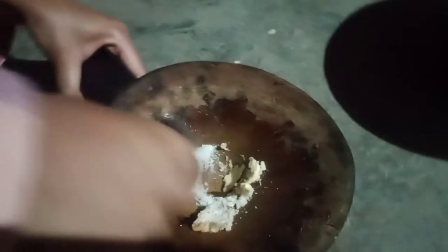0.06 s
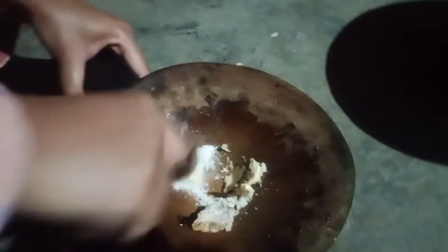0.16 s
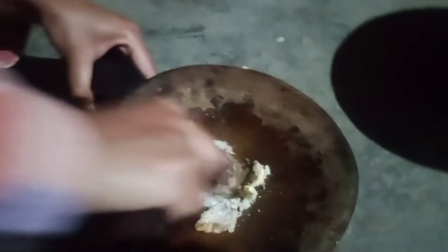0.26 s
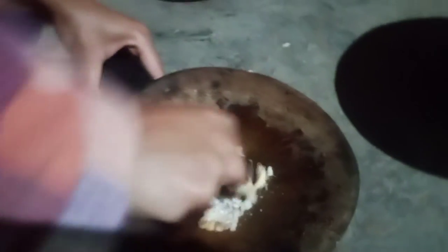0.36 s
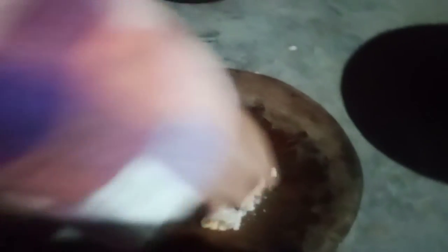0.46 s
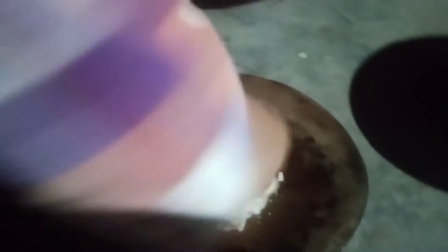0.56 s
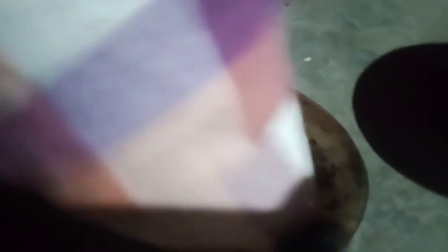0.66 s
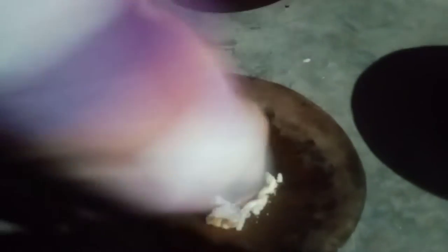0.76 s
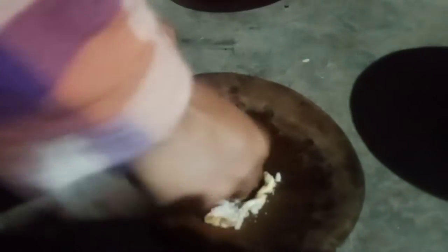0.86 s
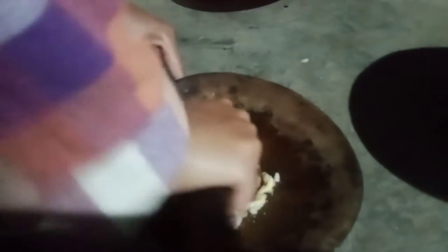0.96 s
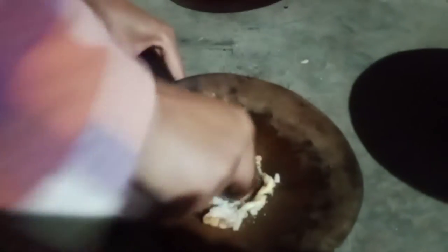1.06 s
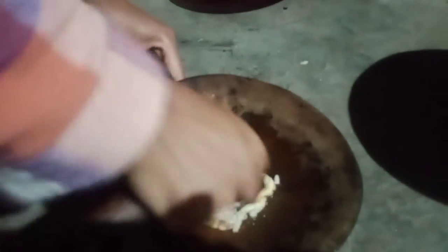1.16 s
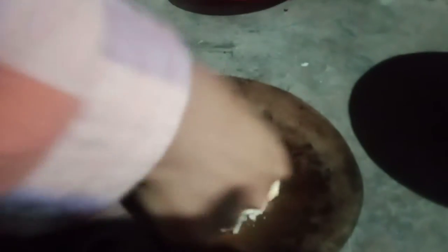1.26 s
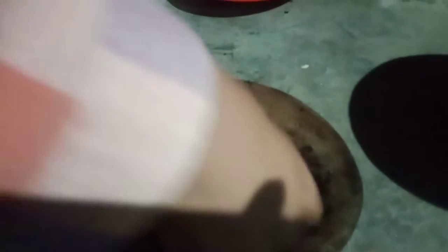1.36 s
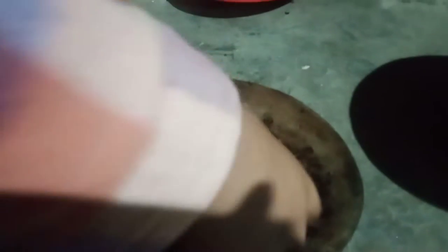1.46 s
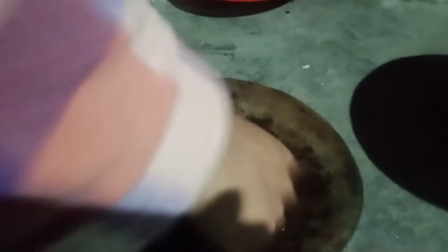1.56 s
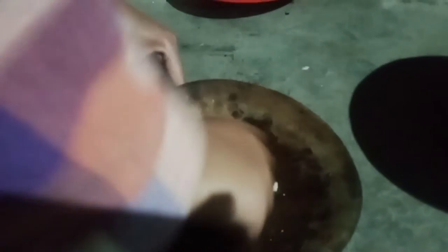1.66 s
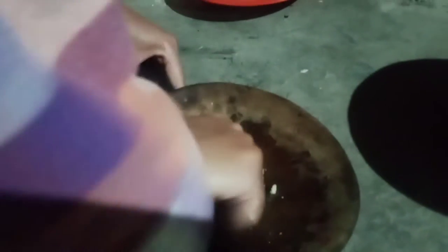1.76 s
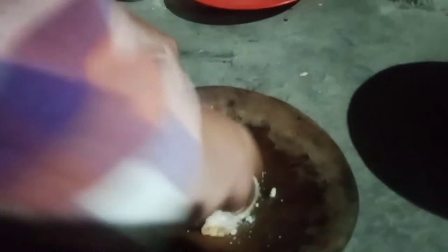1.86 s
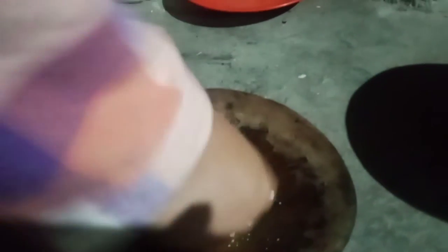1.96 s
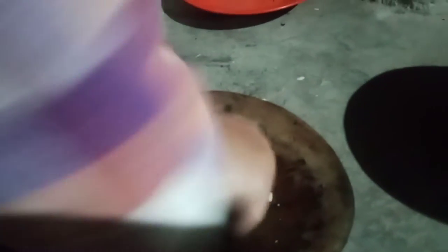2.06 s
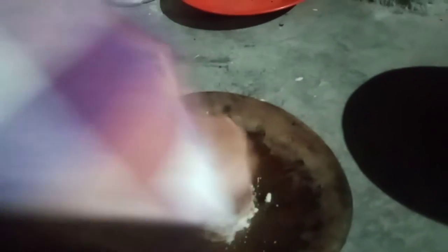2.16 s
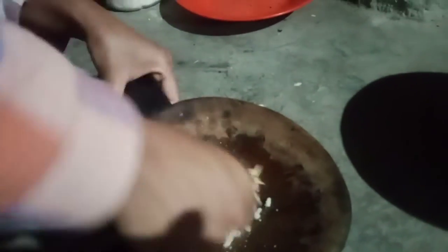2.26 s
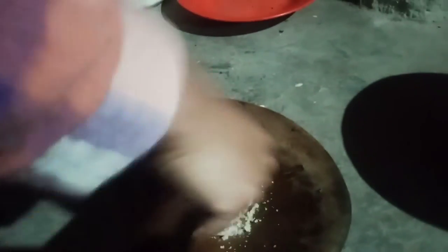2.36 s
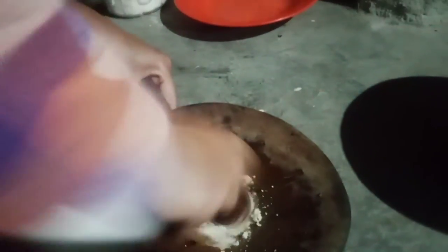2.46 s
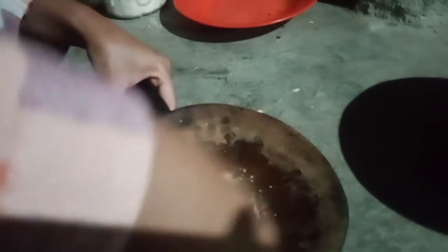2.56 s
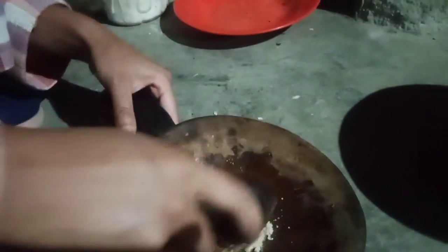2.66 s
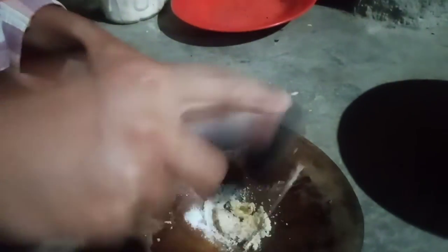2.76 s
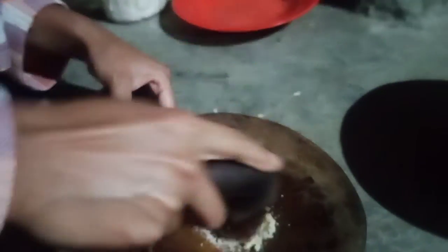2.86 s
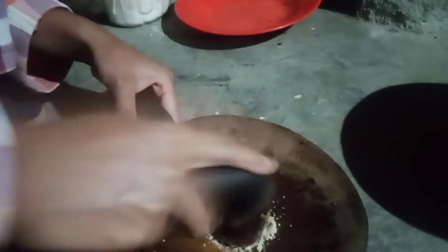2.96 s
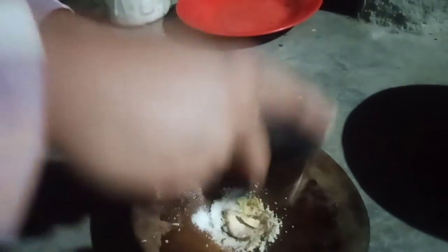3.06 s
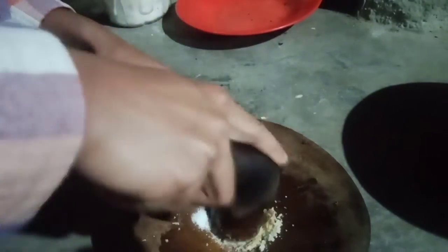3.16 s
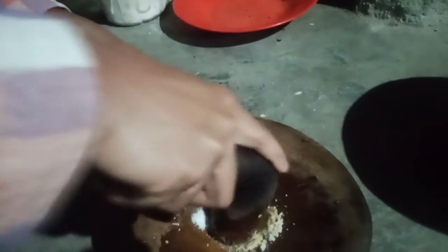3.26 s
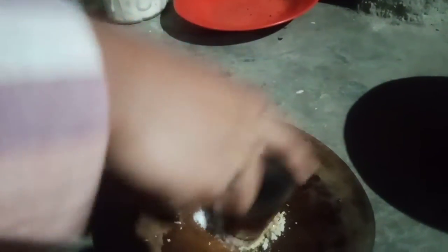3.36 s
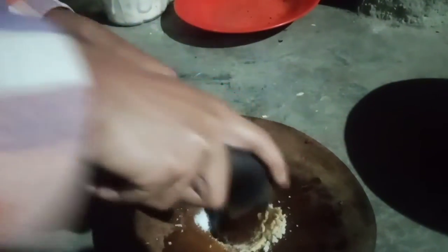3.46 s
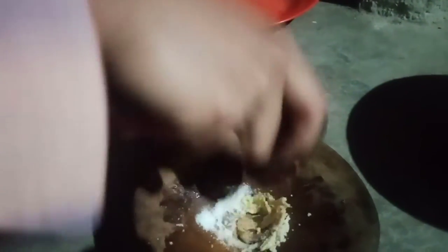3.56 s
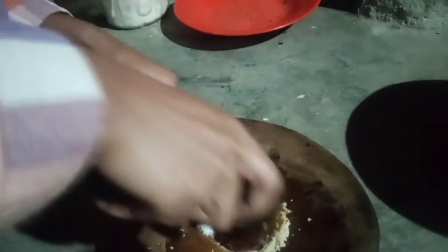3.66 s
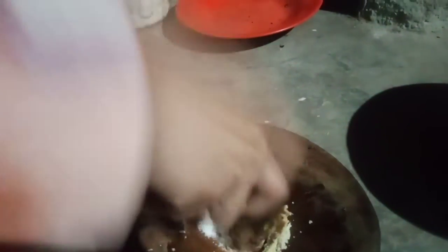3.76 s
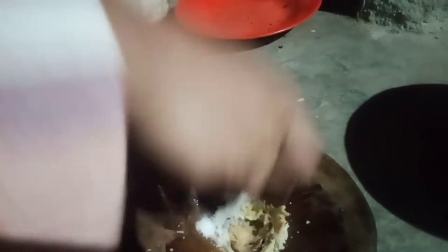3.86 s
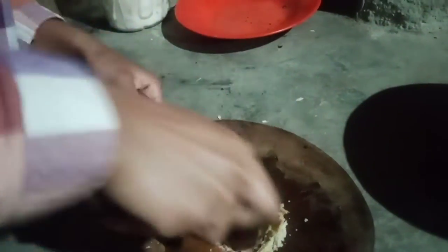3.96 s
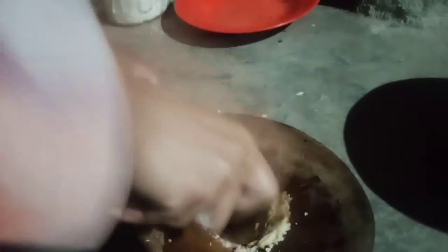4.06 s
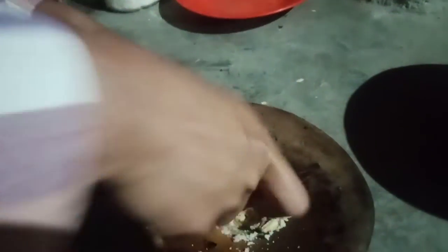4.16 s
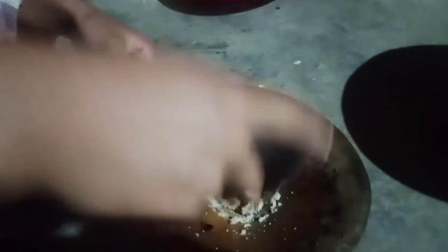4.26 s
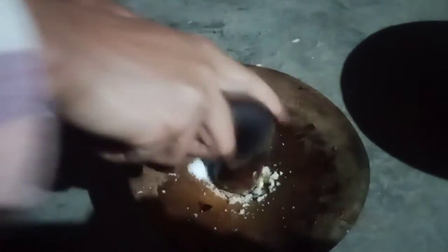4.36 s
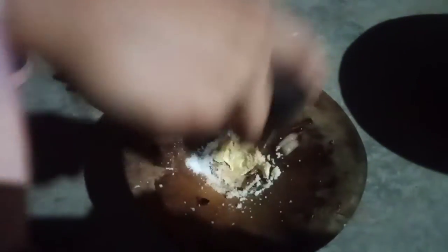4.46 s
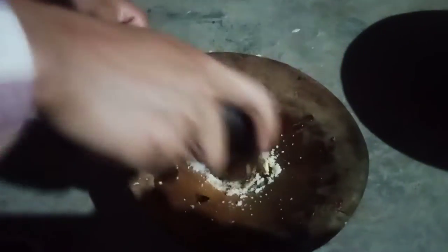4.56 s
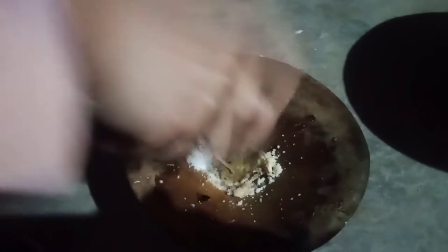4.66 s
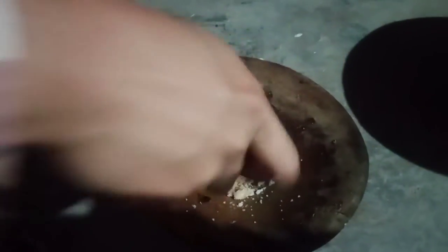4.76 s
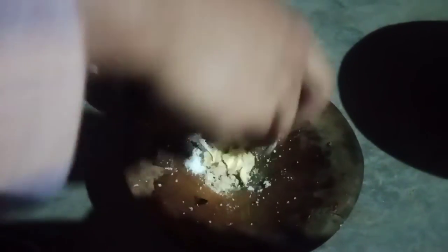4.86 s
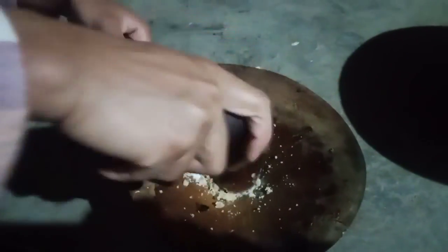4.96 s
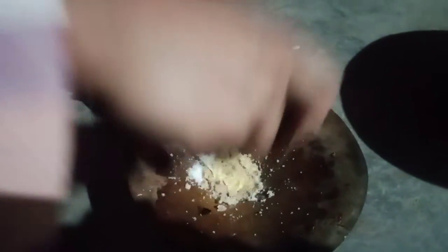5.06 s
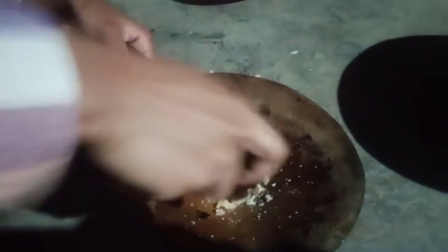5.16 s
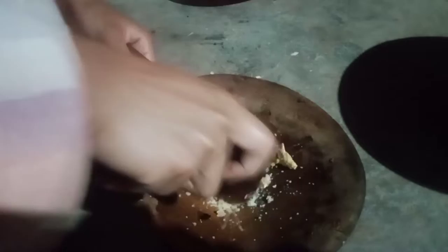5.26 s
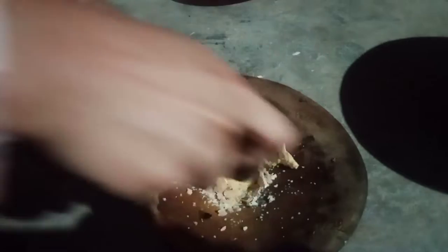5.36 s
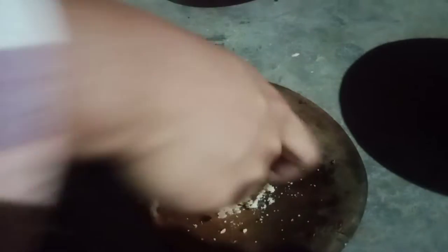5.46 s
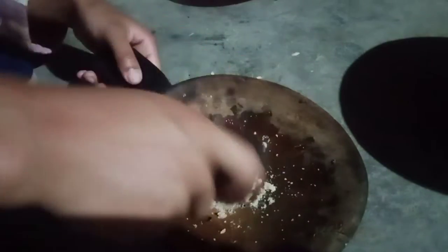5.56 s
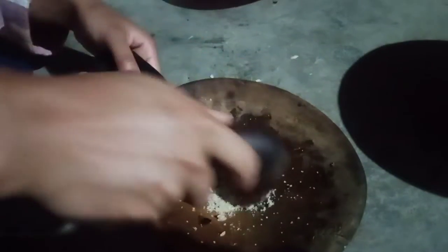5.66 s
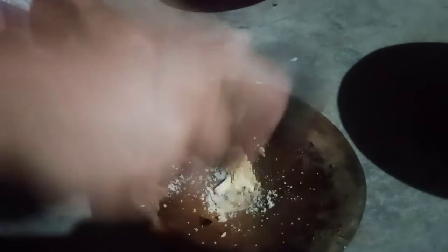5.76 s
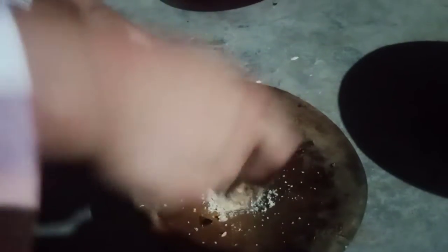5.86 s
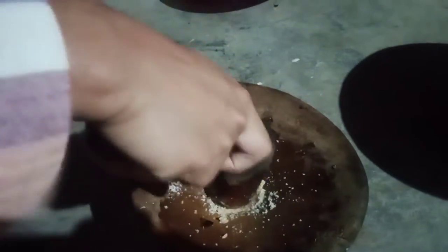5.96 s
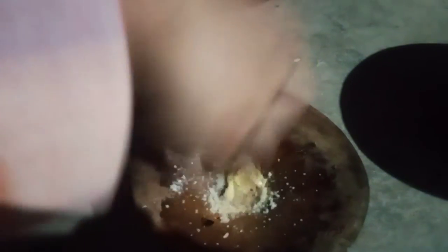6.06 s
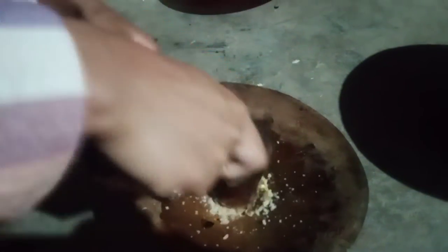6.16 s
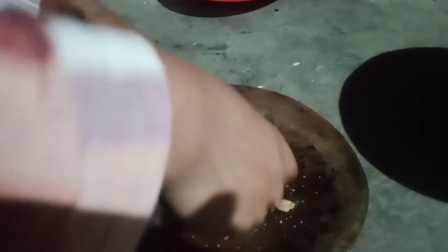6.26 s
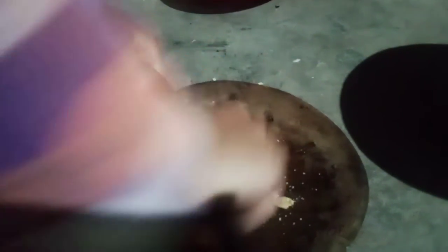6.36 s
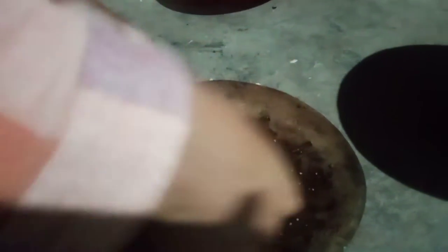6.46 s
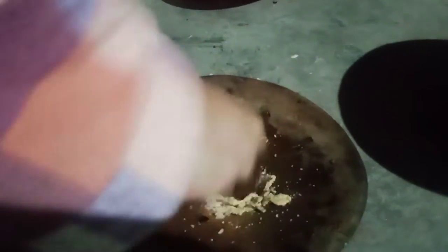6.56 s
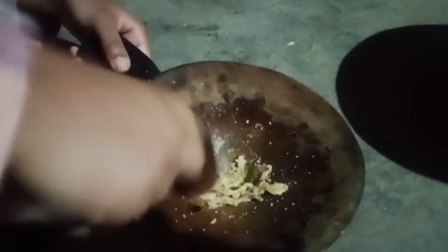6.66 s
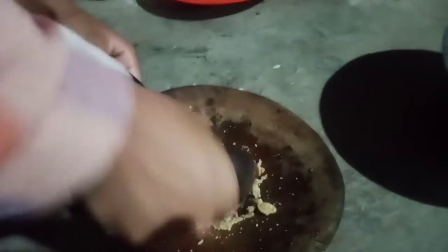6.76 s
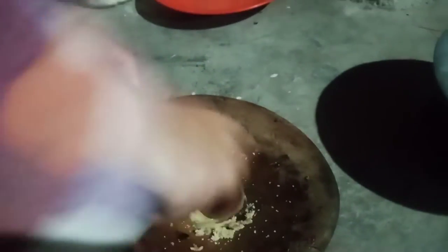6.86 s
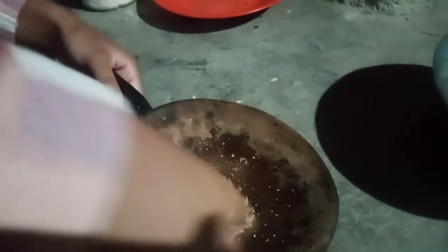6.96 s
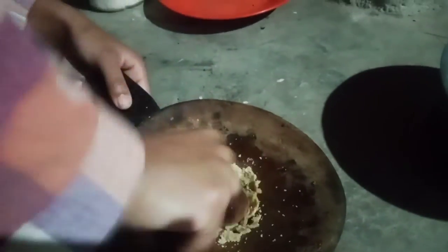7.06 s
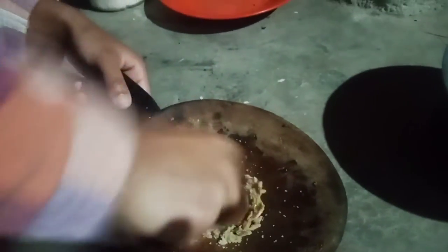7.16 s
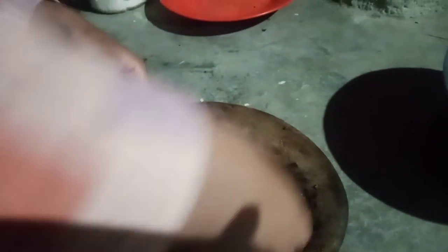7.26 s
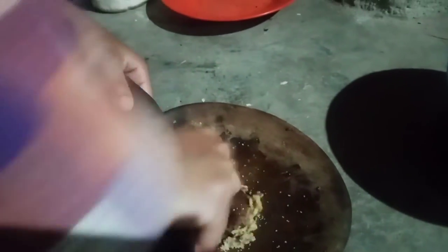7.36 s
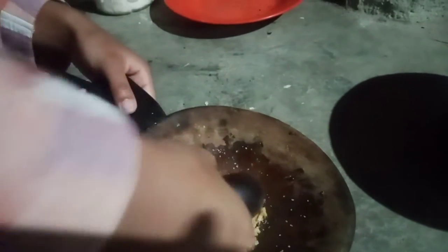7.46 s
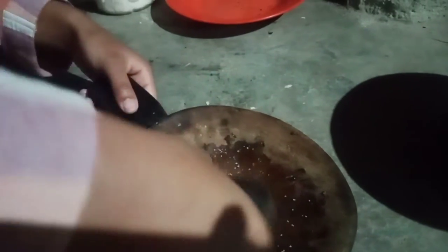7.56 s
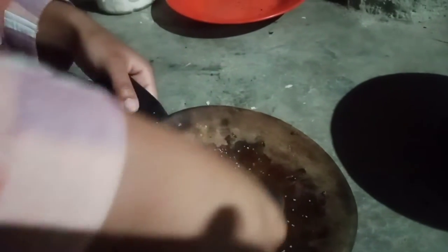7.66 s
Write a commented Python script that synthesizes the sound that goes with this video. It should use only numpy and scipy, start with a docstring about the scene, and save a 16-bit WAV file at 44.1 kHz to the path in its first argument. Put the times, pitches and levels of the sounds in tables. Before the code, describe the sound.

A hand stone scrapes, pounds fast, then scrapes again, crushing garlic and ginger on a shallow stone dish, close up.

```python
"""A shallow stone dish on a concrete floor, a phone's microphone close by. A hand stone grinds
garlic, ginger and salt, first in scraping strokes with a few knocks. From about 3 s it pounds fast: hard
knocks, soft rebounds and swelling thuds. After 6 s it goes back to mostly scraping. Every contact rings
the same dish, with grit hissing above it; a faint hum and a thin chirr fill the pauses."""
import sys
import numpy as np
from scipy import signal
from scipy.fft import rfft, irfft
from scipy.io import wavfile
from scipy.ndimage import uniform_filter1d

SR = 44100
rng = np.random.default_rng(int(sys.argv[2]) if len(sys.argv) > 2 else 0)


def unload_wav(signal):
    """Save mono or channel-first audio to the path in sys.argv[1] as 16-bit WAV at rate SR, clipped to [-1, 1]."""
    wavfile.write(
        sys.argv[1],
        SR,
        np.round(np.clip(np.atleast_2d(signal).T, -1, 1) * 32767).astype(np.int16),
    )


N = 340452

# Hard blows, close to the microphone. Each row: start in seconds, force of thud, low ring, high ring
# and crack in dB, first rebound in dB against the blow.
KNOCKS = [(0.229, -41.5, -35, -42, -57.5, -25.5), (1.522, -45, -51, -53, -53, -25),
          (1.576, -55, -64, -57.5, -48, -25), (1.6316, -47, -82, -81, -57, -45),
          (2.6001, -38, -43, -43, -49, -46), (2.946, -55.5, -49.5, -57, -50.5, -20),
          (3.1081, -24.5, -34, -34, -42, -15.5), (3.2955, -23, -31, -35, -35, -26),
          (3.4848, -25, -27, -27.5, -32.5, -25), (3.6641, -23.5, -31.5, -30.5, -39.5, -20),
          (3.85, -23, -29, -28, -39.5, -26), (3.9739, -24.5, -28, -33, -35, -18.5),
          (4.322, -29.5, -37, -48, -39.5, -20), (4.6905, -24, -31, -31.5, -36, -31),
          (4.804, -30, -37, -41, -52.5, -20), (4.9034, -50, -54.5, -53.5, -49, -20),
          (5.1041, -22, -28, -25, -38.5, -24.5), (5.2259, -27.5, -26, -25.5, -33.5, -21.5),
          (5.9169, -22.5, -32, -36, -36.5, -20), (6.107, -37, -58, -42.5, -36.5, -20),
          (6.171, -36, -52.5, -51, -37.5, -44), (6.2725, -41, -50.5, -50, -52.5, -45),
          (6.6875, -37.5, -44, -43.5, -49.5, -23), (7.2873, -41, -49, -53.5, -80, -25)]
def knocks():
    """Stone strikes stone: a crunch and a click in five bands (thud, low and high ring, grit, fizz)."""
    push, click = np.zeros((5, N)), np.zeros((5, N))
    t = np.arange(SR // 8) / SR
    for start, thud_db, low_db, high_db, crack_db, _ in KNOCKS:
        i = int(start * SR)
        contact_ms = contact_time_ms(thud_db, crack_db)
        # fizz falls away in a weak crack and grows where the crack outweighs the thud
        fizz_db = crack_db - 6.5 + 0.99 * min(crack_db + 41.5, 0) + 2.4 * max(crack_db - thud_db, 0)
        gain = undb([thud_db, low_db, high_db, crack_db, fizz_db])[:, None]
        # the treble of a blow is over sooner than its bass
        tau = contact_ms / 1000 * np.array([[1.2], [1.1], [.9], [.7], [.6]])
        grind = t / tau * np.exp(1 - t / tau)
        splinters = undb([[-25], [-20], [-18], [-13], [-14]]) * np.exp(-(t / 0.02) ** 2)
        push[:, i:i + len(t)] += gain * undb([[-6], [-2.5], [-2.5], [2.5], [2.5]]) * (grind + splinters)
        # a few milliseconds of rising hiss lead into each knock
        lead = int(2 * contact_ms / 1000 * SR)
        push[2:, i - lead:i] += gain[3] * undb([[-9], [-9], [-17]]) * np.linspace(.3, 1, lead)
        # a longer contact softens the click
        click[:, i] += gain[:, 0] * undb([30.62, 30.97, 30.2, 28, 26.2]) / contact_ms
    return push, click


def contact_time_ms(thud_db, crack_db):
    """The more thud over crack, the longer the stones touch."""
    return max(1.39 + 0.0714 * (thud_db - crack_db), .8)


# Soft blows into the paste, and a few rebounds that get their own row. Each row: centre in seconds, length in
# ms, force of thud, low ring, # high ring and grit in dB, first rebound in dB against the blow.
THUDS = [(0.384, 57, -57, -53, -73, -73, -26), (1.546, 47, -45.5, -71, -63, -62, -20),
         (2.81, 39.7, -34.5, -39.5, -45.5, -53.5, -9.5), (2.997, 33.5, -30.5, -38, -39.5, -49, -16),
         (4.16, 42.3, -49.5, -46.5, -37, -60, -20), (4.228, 44, -45.5, -47, -51.5, -64.5, -20),
         (4.273, 36, -66, -90, -80, -58.5, -20), (4.391, 34, -31, -42, -44.5, -43.5, -18),
         (4.575, 43.5, -46, -69, -70, -52.5, -12), (4.856, 36, -43.5, -51, -52, -51.5, -22),
         (4.994, 30, -47, -57.5, -72, -60, -20), (5.064, 29, -49, -58, -59, -59.5, -20),
         (5.485, 34, -46, -59, -69, -57, -20), (5.526, 36, -48.5, -59.5, -57, -55.5, -20),
         (5.578, 43.4, -46, -54, -50.5, -51.5, -20), (5.669, 43.6, -38, -41.5, -40.5, -49, -10),
         (5.808, 40.3, -49, -51, -32.5, -59, -55), (6.533, 30, -54, -66, -70, -76, -34),
         (6.984, 35, -50, -71, -72, -78, -20), (7.016, 47, -52, -62, -59.5, -52.5, -29),
         (7.155, 37, -44, -56, -53.5, -49, -20)]
def thuds():
    """Force swells and fades as the stone sinks into paste, opening with a soft thump on the dish."""
    push, thump = np.zeros((5, N)), np.zeros(N)
    pulse = np.hanning(int(0.0047 * SR))
    # a lean of 1 swells evenly; a heavier thud has less and rises faster
    rows = [(*row[:-1], 2.5 - 0.087 * (row[2] + 53)) for row in THUDS]
    rows += [(*row, 0.91) for row in rebounds()]
    for centre, length_ms, thud_db, low_db, high_db, grit_db, lean in rows:
        n = int(length_ms / 1000 * SR)
        i = int(centre * SR) - n // 2
        swell = np.sin(np.pi * np.linspace(0, 1, n) ** np.clip(lean, .35, 1.2)) ** 1.02
        gain = undb([thud_db - 2.5, low_db, high_db, grit_db, grit_db - 11.5])[:, None]
        push[:, i:i + n] += gain * swell
        thump_db = thud_db - 9 + min(thud_db + 47, 0)  # light thuds barely thump
        thump[i + int(0.058 * n):][:len(pulse)] += undb(thump_db) * pulse
    return push, thump


# A rebound's tone against its blow, then the fade with each further rebound.
# Each list: thud, low ring, high ring and grit in dB.
REBOUND_COLOUR_DB = [.3, 0.2, -0, .7]
REBOUND_FADE_DB = [-6.5, -13, -15, -7.5]
def rebounds(gap_s=0.0703, length_ms=38.5, clear_s=.025):
    """The stone bounces softly up to three times after a blow, until the next one lands."""
    # a knock in longer contact lifts off later
    blows = [(start + .009 * (contact_time_ms(db[0], db[3]) - 1.68), *db) for start, *db in KNOCKS]
    blows = sorted(blows + [(centre, *db) for centre, _, *db in THUDS])
    rows = []
    for (lift_s, *db, first_db), (next_s, *_) in zip(blows, blows[1:]):
        for k in range(3):
            centre = lift_s + (k + 1) * gap_s
            if centre < next_s - clear_s:
                levels = np.add(db, REBOUND_COLOUR_DB) + first_db + k * np.array(REBOUND_FADE_DB)
                rows.append((centre, length_ms, *levels))
    return rows


# Grinding strokes across the dish. Each row: start and length in seconds, grit force in dB,
# rise along the stroke in dB, ring against the grit in dB.
SCRAPES = [(0.241, 0.11, -64, -6, 13), (0.318, 0.11, -48, 15, -3.5), (0.412, 0.21, -51.5, 7, -4),
           (0.62, .16, -48, -5.5, -4.5), (0.801, 0.16, -52.5, 3.5, -5), (0.969, 0.12, -48.5, 5.5, -5),
           (1.097, 0.13, -56, -7, -3), (1.217, 0.12, -67.5, -7, -8), (1.526, 0.12, -61, 4, 2.5),
           (1.613, 0.12, -54, -15, -7), (1.73, 0.14, -52, -11, -13), (1.87, 0.19, -51.5, 16.5, -8.5),
           (2.072, 0.15, -51, 8, -6), (2.232, 0.077, -49, 8, -7.5), (2.35, 0.07, -54, 1, -2),
           (2.42, 0.16, -56.5, -14, -6), (2.615, 0.11, -61.5, 2, -4.5), (2.735, 0.064, -64, 0, -35),
           (6.294, 0.061, -53.5, 0, -16), (6.345, 0.065, -45.5, 6, -8.5), (6.408, 0.089, -54.5, -9, -16),
           (6.523, .165, -60, -22.5, -6), (6.69, 0.12, -55.5, 6, -10), (6.82, .13, -55.5, 11.5, -4),
           (6.938, 0.063, -60, -3, -27), (7.025, 0.11, -60.5, -3, -18), (7.165, 0.094, -50, 10, -2.5),
           (7.294, 0.29, -59, -13.5, -10.5)]
def scrapes(gather_s=0.031, slow_s=0.032, drag_s=0.013):
    """The sliding stone gathers speed, catches and slips unevenly, slows and drags on faintly."""
    push = np.zeros((5, N))
    for start, length_s, grit_db, rise_db, ring_db in SCRAPES:
        t = np.arange(int((length_s + 2 * drag_s) * SR)) / SR - drag_s
        edges = np.maximum(1 - t / gather_s, 0) + np.maximum(1 - (length_s - t) / slow_s, 0)
        stroke_db = grit_db + rise_db * (t / length_s - .5) - 18 * edges
        band_db = np.array([[ring_db - 22.5], [ring_db - 8], [ring_db - 3], [0], [-11]])
        push[:, int((start - drag_s) * SR):][:, :len(t)] += undb(stroke_db + band_db)
    # bass and treble slip partly on their own
    band_slip = np.array([walk(25) for _ in range(5)])
    return push * undb(1.08 * walk(45) + 1.52 * walk(150) + 2.1 * band_slip)


# The dish on the floor, its modes grouped as thud, low ring and high ring.
# Each row: frequency in Hz, relative level in dB, time to fade by 60 dB in seconds.
DISH_MODES = [
    [(174.3, -4.5, 0.037), (238.6, -3, 0.021), (327.6, -6, 0.0097)],
    [(526, -7, 0.027), (658, -3, 0.027), (760, -0.5, 0.017), (964, -2.5, 0.027)],
    [(1017, 3, 0.012), (1307, 4, 0.02), (1459, 5, 0.012), (1654, 4.5, 0.0076), (2000, -24.5, .02),
     (2210, -30.5, 0.03)],
]
def dish(forces):
    """Each force band rings its own group of modes; a small dish radiates no deep bass."""
    return highpass(sum(ring(force, modes) for force, modes in zip(forces, DISH_MODES)), 150)


# The stone in the hand. Each row: frequency in Hz, relative level in dB, time to fade 60 dB in seconds.
STONE_MODES = [(3140, 1, 0.013), (3524, -1, .03), (3960, -7, 0.065), (5060, -19, 0.075),
               (6026, 12.5, 0.017), (6530, -3, 0.11), (7330, -6.5, 0.012)]
def hand_stone(force):
    """The hand stone rings high, above the range of the dish."""
    return undb(-6) * highpass(ring(force, STONE_MODES), 2900)


# Grit and its finest fizz, from close up. Each row: frequency in Hz, relative spectral level in dB.
GRIT_SPECTRUM = [(1290, -33.5), (2200, -5), (2450, -14), (2690, -8), (3180, -2), (3760, 0), (5750, 4),
                 (6450, 5.5), (7180, 1.5), (8000, -10), (10400, -36.5), (17600, -120)]
FIZZ_SPECTRUM = [(4590, -26.5), (7800, -4.5), (9680, -1.5), (12300, -23), (15200, -10.5), (16100, -15),
                 (16500, -38)]
def grit(coarse, fine):
    """Grains crushed between the stones hiss above the ring."""
    return colour(coarse, GRIT_SPECTRUM) + colour(fine, FIZZ_SPECTRUM)


def grains(share, spread_db):
    """Grit that breaks: a share of the samples click, a few of them harder."""
    size = undb(np.minimum(spread_db * rng.exponential(size=N), 12))
    return unit(rng.standard_normal(N) * size * (rng.random(N) < share))


def salt_snaps(per_second, boost):
    """Now and then a salt grain snaps: a millisecond of extra treble force."""
    burst = uniform_filter1d(1. * (rng.random(N) < per_second / SR), 40) * 40
    return 1 + boost * burst * np.array([[0], [0], [.3], [1], [1]])


def room(near, t60_s=0.05, level_db=-12):
    """Reflections around the dish die quickly and stay well under the close sound."""
    t = np.arange(SR // 3) / SR
    tail = rng.standard_normal(len(t)) * undb(-60 * t / t60_s)
    return undb(level_db) * signal.oaconvolve(near, tail / np.linalg.norm(tail))[:N]


# The air of the place. Each row: frequency in Hz, relative spectral level in dB.
AIR_SPECTRUM = [(24, -49), (40, -9), (233, -7), (510, -23.5), (981, -25.5), (1620, -13), (3130, -28),
                (5870, -16.5), (7950, -22.5), (15300, -39), (16500, -45.5)]
# A faint low hum and a thin chirr. Each row: time in seconds, level in dB.
DRONE_HZ, DRONE = 235, [(0, -76), (1.3, -83.5), (2.2, -70), (6.0, -74.5), (6.75, -71.5), (7.3, -86),
                        (7.72, -72)]
CHIRR_HZ, CHIRR = 5820, [(0, -76.5), (1.45, -85), (2.6, -87), (7.72, -96)]
def background():
    """Soft air noise, two bands of hum and a thin chirr, each wavering in level."""
    t = np.arange(N) / SR
    air = undb(-78.5 + 7.2 * walk(4.3)) * colour(rng.standard_normal(N), AIR_SPECTRUM)
    hum = undb(-82 + 6.7 * walk(5.3)) * noise_band(524, width_hz=53)
    drone = undb(np.interp(t, *np.transpose(DRONE)) + 4 * walk(11)) * noise_band(DRONE_HZ, width_hz=15)
    chirr = undb(np.interp(t, *np.transpose(CHIRR)) + 5.3 * walk(15)) * noise_band(CHIRR_HZ, 170)
    return air + hum + drone + chirr


def ring(force, modes, wander_db=2.5):
    """Damped modes, neighbours in opposite phase; their drive varies as the point of contact wanders."""
    t = np.arange(SR // 8) / SR
    decays = [(-1) ** k * undb(db - 60 * t / t60) * np.sin(2 * np.pi * hz * t) / np.sqrt(t60)
              for k, (hz, db, t60) in enumerate(modes)]
    ringing = sum(signal.oaconvolve(force * undb(wander_db * walk(14)), decay)[:N] for decay in decays)
    return ringing / np.linalg.norm(sum(decays))


def colour(x, spectrum):
    """Causal filter with the given spectrum; white noise comes out at its own level."""
    hz, db = np.transpose(spectrum)
    log_gain = np.interp(np.log(np.linspace(1, SR / 2, 2049)), np.log(hz), db) * np.log(10) / 20
    cepstrum = irfft(log_gain)
    cepstrum[1:2048] *= 2  # fold to minimum phase
    cepstrum[2049:] = 0
    taps = irfft(np.exp(rfft(cepstrum)))
    return signal.oaconvolve(x, taps / np.linalg.norm(taps))[:N]


def walk(rate):
    """Random levels held 1 / rate s and slewed twice."""
    hold = int(SR / rate)
    steps = np.repeat(rng.standard_normal(N // hold + 1), hold)
    return uniform_filter1d(uniform_filter1d(steps, hold), hold)[:N]


def noise_band(hz, width_hz):
    sos = signal.butter(1, [hz - width_hz / 2, hz + width_hz / 2], "band", fs=SR, output="sos")
    return unit(signal.sosfilt(sos, rng.standard_normal(N)))


def highpass(x, hz, order=4):
    return signal.sosfilt(signal.butter(order, hz, "high", fs=SR, output="sos"), x)


def undb(db):
    return 10 ** (np.asarray(db) / 20)


def unit(x):
    return x / np.sqrt(np.mean(x ** 2))


def scene():
    """Blows and strokes drive dish, hand stone and grit, close up and almost in mono."""
    crunch, impact = knocks()
    swells, thump = thuds()
    impact[0] += thump
    push = crunch + (swells + scrapes()) * salt_snaps(per_second=35, boost=1.76)
    force = [push[k] * grains(share=.5, spread_db=2.83) + impact[k] for k in range(5)]
    near = dish(force[:3]) + hand_stone(force[3]) + grit(force[3], force[4])
    mid = near + room(near) + background()
    # a faint stereo spread in the highest treble; the rest is mono
    scatter = rng.standard_normal(64) * np.hanning(64)
    treble = highpass(near, 9500, order=3)
    side = undb(-30.5) * np.convolve(treble, scatter / np.linalg.norm(scatter))[:N]
    return np.array([mid + side, mid - side])


def record(dry):
    """The sound is hollow near 2.6 kHz; the phone cuts the top above 16.6 kHz."""
    hollow = dry - 0.17 * signal.lfilter(*signal.iirpeak(2600, 6, fs=SR), dry)
    return signal.sosfilt(signal.ellip(8, .2, 70, 16600, fs=SR, output="sos"), hollow)


dry = scene()
out = record(dry)
unload_wav(out)
```